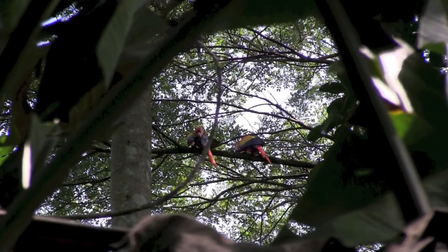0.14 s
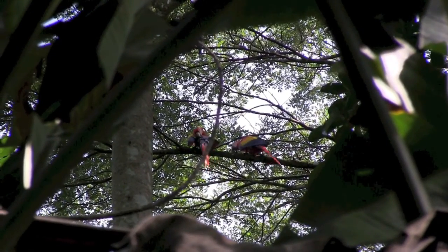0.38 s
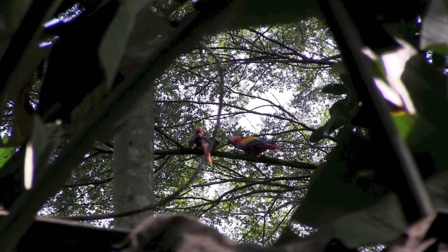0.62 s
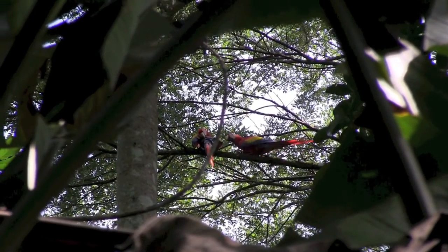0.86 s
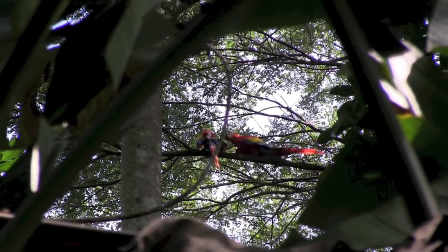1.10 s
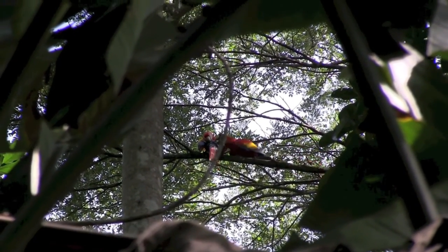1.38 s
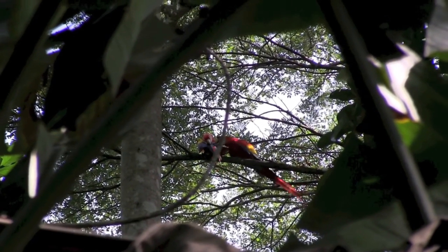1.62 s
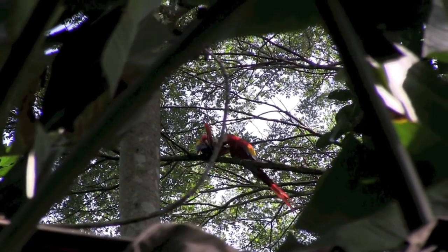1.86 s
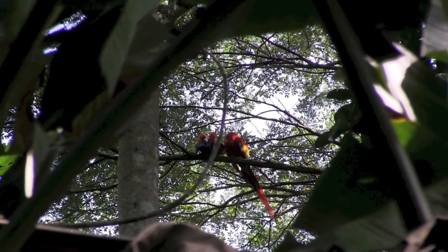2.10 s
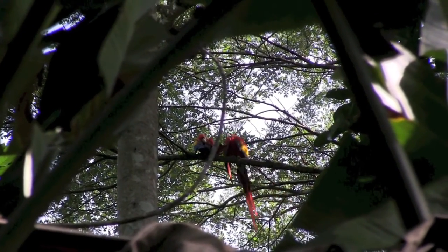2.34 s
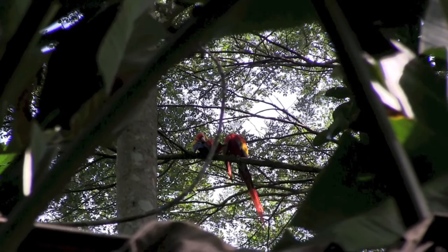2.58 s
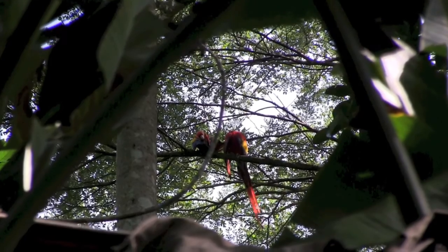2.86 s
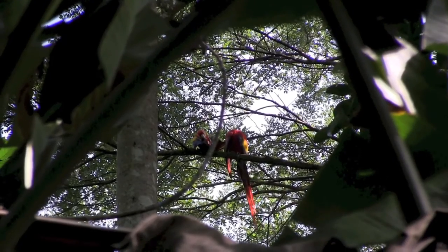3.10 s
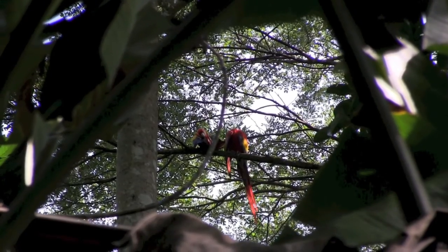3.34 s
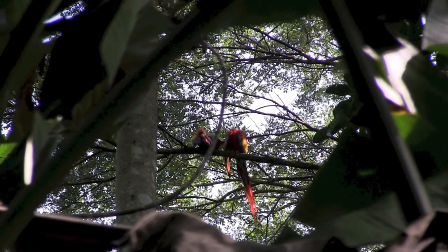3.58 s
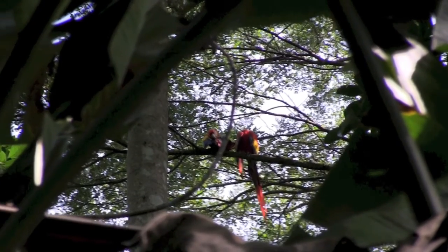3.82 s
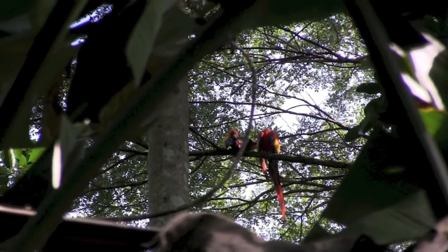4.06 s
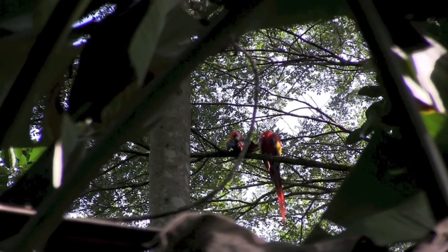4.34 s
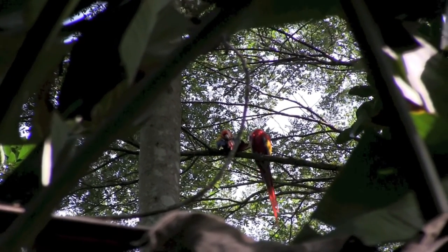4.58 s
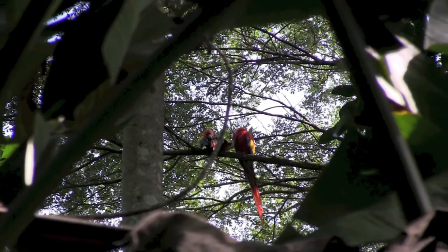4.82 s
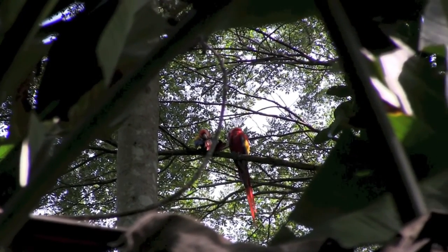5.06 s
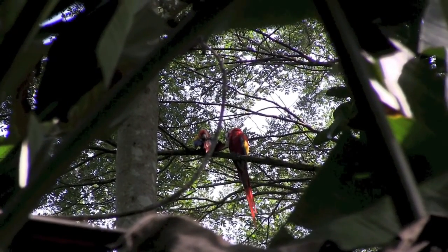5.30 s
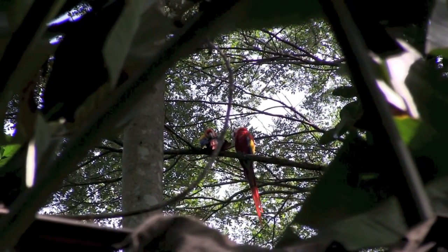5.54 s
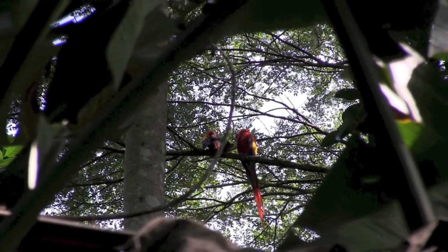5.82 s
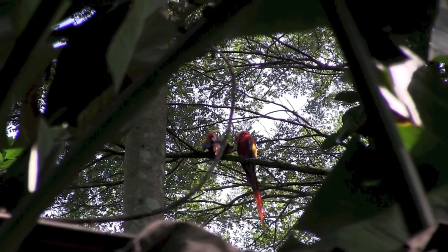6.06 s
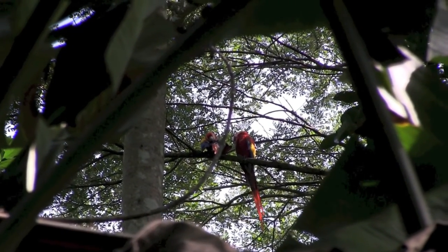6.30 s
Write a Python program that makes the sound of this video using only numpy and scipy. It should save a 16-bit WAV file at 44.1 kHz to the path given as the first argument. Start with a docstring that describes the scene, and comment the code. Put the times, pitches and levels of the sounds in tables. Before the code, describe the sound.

Piercing insect chorus throughout, with one brief hoarse parrot squawk over a soft dove hoot, followed by soft wing rustles, dull knocks and distant bird twitter.

```python
"""A cicada chorus drones near 8 kHz through a tropical forest: noise shaped by the tymbal spectrum.
A second insect buzzes in long bouts as pulses ring a resonance; a cricket chirps about once a second.
A dove hoots as a gliding sine; a large parrot squawks once as pulses and breath ring its throat.
A small bird twitters far off and leaves rustle, all in bands of noise; knocks and twig ticks ring damped modes.
Forest air hisses below as coloured noise, with a low wavering hum and a thin high insect band."""
import sys
import numpy as np
from scipy import signal
from scipy.fft import rfft, irfft
from scipy.io import wavfile

SR = 44100
rng = np.random.default_rng(int(sys.argv[2]) if len(sys.argv) > 2 else 0)


def voltage_ratio(level):
    """Linear amplitude factor for a level in decibels (scalar or array-like)."""
    return 10 ** (np.asarray(level, float) / 20)


def dump_mix(stems):
    """Bounce the given channels to the path in sys.argv[1] as a 16-bit WAV at rate SR."""
    frames = np.atleast_2d(stems).T  # one column per channel
    limited = np.clip(frames, -1, 1)  # hard clip at full scale
    pcm = np.round(limited * 32767).astype(np.int16)
    wavfile.write(sys.argv[1], SR, pcm)


N = 283122
T = np.arange(N) / SR   # s
HZ = np.maximum(np.arange(N // 2 + 1) * SR / N, 1)
# The tables of the point sources give levels before the 2 dB that scene() adds to them all.

# level of the cicada chorus: start_s, level_db
CHORUS_LEVEL = [(0, -23), (1, -24), (1.5, -24), (2.5, -23), (3.5, -24), (4.5, -24), (5.5, -23.5),
                (6.42, -23.5)]
# relative spectrum of the tymbals: frequency_hz, density_db (per Hz)
TYMBAL_SPECTRUM = [(3710, -50.5), (6300, -33.5), (6860, -23), (7510, -4), (7900, 1.5), (8170, 6),
                   (8500, -4.5), (8720, -13.5), (8940, -25.5), (9700, -39.5), (12600, -24.5), (21300, -120)]
# throbs that stand out of the chorus, each at a singer's own rate, one of them slow near 11 Hz: # throbs_per_s,
# depth (0-1), gain_db (before the throb)
STANDOUT_THROBS = [(52.9, 0.15, -8), (64.5, 0.74, -14), (69.8, 0.96, -12.5), (31.8, 0.49, -9),
                   (11.37, 0.14, -8.5)]


def cicadas():
    """Superposition: countless tymbal clicks merge into noise; layers of it throb at singers' own rates, one
    slowly near 11 Hz."""
    clicks = rng.standard_normal((2, N)) * voltage_ratio(0.42 * drift(41))
    for per_s, depth, gain_db in STANDOUT_THROBS:
        phase = 2 * np.pi * np.cumsum(per_s * (1 + 0.00953 * drift(1.65))) / SR
        throb = (1 + np.clip(depth, 0, 1) * np.sin(phase)) ** 2
        clicks += voltage_ratio(gain_db) * rng.standard_normal((2, N)) * throb
    return voltage_ratio(in_time(CHORUS_LEVEL)[0]) * spread(clicks, TYMBAL_SPECTRUM)


BUZZ_PER_S, BUZZ_HZ, BUZZ_WIDTH_HZ = 180, 6540, 420   # width of each of two stages
BOUT_EDGE_S = 0.11
# bouts of the buzzing insect: start_s, fade_start_s, level_db
BUZZ_BOUTS = [(-.5, 1.82, -53.5), (2.93, 4.82, -52.5), (5.53, 7, -53.5)]


def buzzing_insect():
    """Forced resonance: regular wing strokes ring a narrow band, blurred by distance."""
    cycles = np.cumsum(BUZZ_PER_S * (1 + 0.0044 * drift(1.8))) / SR
    strokes = np.diff(np.floor(cycles), prepend=0) * (1 + .3 * rng.standard_normal(N))
    strokes = strokes + .055 * rng.standard_normal(N)
    ring = resonance(resonance(strokes, BUZZ_HZ, BUZZ_WIDTH_HZ), BUZZ_HZ, BUZZ_WIDTH_HZ)
    envelope = 0
    for start, end, db in BUZZ_BOUTS:
        bout = ramp(start, start + BOUT_EDGE_S) - ramp(end, end + BOUT_EDGE_S)
        envelope = envelope + voltage_ratio(db) * bout
    return envelope * rms_one(ring)


CHIRP_HZ, CHIRP_S, CHIRP_RISE = 6040, 0.29, 0.24   # rise as a share of the length
# chirps of the cricket: start_s, level_db
CRICKET_CHIRPS = [(.5, -57), (1.33, -52.5), (2.34, -52.5), (3.47, -52.5), (4.45, -52), (5.33, -53),
                  (6.22, -52.5)]


def cricket():
    """Modulation: each chirp is a tone wavering in level and pitch, inside a wider rasp."""
    phase = 2 * np.pi * np.cumsum(CHIRP_HZ + 25 * drift(25.0)) / SR
    tone = voltage_ratio(2.5 * drift(30.0)) * np.sin(phase)
    rasp = rms_one(resonance(resonance(rng.standard_normal(N), CHIRP_HZ, 250), CHIRP_HZ, 250))
    envelope = sum(voltage_ratio(db) * swell(start, CHIRP_S, CHIRP_RISE) for start, db in CRICKET_CHIRPS)
    return envelope * (.8 * tone + .9 * rasp)


HOOT_PEAK_S, HOOT_END_S, HOOT_DB = 0.41, 0.76, -47
HOOT_SWELL_DB_PER_S, HOOT_FADE_DB_PER_S = 24, 38
# pitch of the hoot, which dips, then lifts: start_s, pitch_hz
DOVE_PITCH = [(0, 455), (.09, 433), (.37, 443), (.55, 457), (.75, 455)]


def dove():
    """Near-pure tone: one long hoot, already under way, swells to its peak, then fades."""
    below_peak_db = np.maximum(HOOT_SWELL_DB_PER_S * (HOOT_PEAK_S - T), HOOT_FADE_DB_PER_S * (T - HOOT_PEAK_S))
    hz, = in_time(DOVE_PITCH)
    hoot = whistle(hz, HOOT_DB - below_peak_db, 0.5, 8.0)
    return hoot * (1 - ramp(HOOT_END_S - .06, HOOT_END_S))


BEAK_OPENS_S, BEAK_OPEN_S = 0.46, 0.52
# parrot squawk, lowest throat resonance: start_s, level_db, centre_hz
SQUAWK_COURSE = [(.375, -67, 1000), (.41, -44.5, 1010), (.44, -40.5, 1030), (.52, -41, 870),
                 (.56, -46.5, 920), (.625, -38, 950), (.69, -47, 1000), (.83, -56.5, 1020),
                 (1.05, -65.5, 980)]
# upper throat resonances before the beak gains: centre_hz, width_hz (first of two stages), gain_db
THROAT_RESONANCES = [(1650, 320, -1), (2940, 190, -1), (3446, 180, -4), (4790, 470, -11.5),
                     (6060, 410, -13), (4100, 2700, -9), (10960, 870, -1)]
# beak gain on the first upper resonance: shut_db, open_db
BEAK_SECOND_DB = (-5.5, 1.5)
# beak gain on the other upper resonances: shut_db, open_db
BEAK_BRIGHT_DB = (-11.5, -2)


def parrot():
    """Source and filter: uneven syrinx pulses and breath ring the throat; an opening beak lifts the upper ones."""
    db, low_hz = in_time(SQUAWK_COURSE)
    second_db = np.interp(T, [BEAK_OPENS_S, BEAK_OPEN_S], BEAK_SECOND_DB)
    bright_db = np.interp(T, [BEAK_OPENS_S, BEAK_OPEN_S], BEAK_BRIGHT_DB)
    cycles = np.cumsum(140 * (1 + .2 * drift(30.0))) / SR   # 140 pulses per s, wandering
    pulses = np.diff(np.floor(cycles), prepend=0) * voltage_ratio(1.3 * drift(60.0))
    breath = 0.2 * rng.standard_normal(N) * np.exp(-2.0 * (cycles % 1))   # fades within each cycle
    source = pulses + breath
    rings = []
    for hz, width, gain_db in THROAT_RESONANCES:
        ring = resonance(resonance(source, hz, width), hz, 2.5 * width)
        rings.append(voltage_ratio(gain_db) * rms_one(ring))
    lowest = rms_one(gliding(source, low_hz, 297))
    bright = sum(ring * (-1) ** k for k, ring in enumerate(rings[1:]))   # signs alternate
    voice = lowest - voltage_ratio(second_db) * rings[0] + voltage_ratio(bright_db) * bright
    return voice * voltage_ratio(db) * (T > SQUAWK_COURSE[0][0]) * (T < SQUAWK_COURSE[-1][0])


NOTE_WIDTH_HZ, NOTE_SAG_PER_S = 95, .03   # sag as a share of the pitch
# held notes of the far bird: start_s, length_s, pitch_hz, level_db
BIRD_NOTES = [(1.48, .18, 5250, -64), (1.82, .12, 2280, -61), (2.15, .25, 5100, -66),
              (3.08, .14, 4550, -61), (3.28, .16, 2270, -62), (4.2, .11, 5050, -63),
              (5.14, .18, 4420, -57.5), (5.48, .5, 4880, -57), (5.85, .3, 4740, -64), (5.5, .75, 3900, -62)]
# quick trills of the far bird: start_s, length_s, centre_hz, span_hz, level_db
BIRD_TRILLS = [(1.72, .25, 4400, 300, -61), (5.13, .34, 5200, 800, -56.5), (5.27, .36, 4700, 900, -54.5),
               (5.28, .4, 3930, 220, -56.5)]


def far_bird():
    """Multipath smearing: the forest turns notes into broken, narrow noise and trills into wider patches."""
    rows = []
    for start, length, hz, db in BIRD_NOTES:
        rows.append((start, length, hz, hz * (1 - NOTE_SAG_PER_S * length), NOTE_WIDTH_HZ, db))
    for start, length, hz, span, db in BIRD_TRILLS:
        rows.append((start, length, hz, hz, span, db))
    return puffs(rows, grain_db=1.5)


# dull knocks and twig ticks: start_s, level_db, pitch_hz, t60_s
KNOCKS_AND_TICKS = [(2.269, -35, 248, 0.14), (2.562, -37, 282, 0.098), (5.855, -41, 2380, 0.027),
                    (6.16, -41, 2020, 0.026)]


def knocks():
    """Damped modes: a soft click rings one mode and its rough neighbours."""
    out = np.zeros(N)
    for start, db, hz, t60 in KNOCKS_AND_TICKS:
        t = T[:round(t60 * SR)]
        ring = sum(np.sin(2 * np.pi * hz * ratio * t) for ratio in (.85, 1, 1.25)) / 2
        onset = np.minimum(t * hz / 2.1, 1)   # full after 2.1 cycles
        out[round(start * SR):][:len(t)] += voltage_ratio(db - 60 * t / t60) * ring * onset
    return out


RUSTLE_SPAN = 1   # width as a share of the centre
# breaths of wind in the leaves: start_s, length_s, centre_hz, level_db
LEAF_RUSTLES = [(1.34, 0.24, 250, -62.5), (2.197, .3, 2830, -58), (2.5, 0.36, 1380, -57),
                (5.0, 1, 1010, -60), (5.72, 0.62, 1440, -60), (6.2, 0.78, 2220, -56.5)]
# wing shuffles: start_s, length_s, level_db (before the feather gains)
WING_SHUFFLES = [(1.445, 0.15, -54), (1.665, 0.22, -51), (2.22, 0.15, -48.5), (2.512, 0.16, -54),
                 (2.843, 0.11, -58.5), (3.553, 0.33, -67), (4.1, 0.22, -61)]
# bands of the feather swish: centre_hz, width_hz, gain_db
FEATHER_BANDS = [(577, 320, -1.5), (1340, 630, -6)]


def leaves():
    """Granular friction: clumped grains of moving foliage and feathers."""
    rows = []
    for start, length, db in WING_SHUFFLES:
        for hz, width, gain_db in FEATHER_BANDS:
            rows.append((start, length, hz, hz, width, db + gain_db))
    for start, length, hz, db in LEAF_RUSTLES:
        rows.append((start, length, hz, hz, RUSTLE_SPAN * hz, db))
    return puffs(rows, grain_db=3.0)


FOREST_T60_S = 0.51


def forest(x):
    """Multiple scattering off trunks and leaves: an exponentially dying noise tail, other in each ear."""
    t = T[:SR]
    tail = rng.standard_normal((2, SR)) * voltage_ratio(-60 * t / FOREST_T60_S) * (t > .012)
    tail = tail / np.sqrt(np.sum(tail ** 2) / 2)
    return signal.fftconvolve(x[None], tail, axes=1)[:, :N]


AIR_DB = -47
# relative spectrum of the forest air: frequency_hz, density_db (per Hz)
AIR_SPECTRUM = [(15, -48), (25, -10), (64, -6), (119, -6.5), (259, -3), (304, -4.5), (504, -7.5),
                (565, -6.5), (664, -10), (3310, -20), (4450, -17), (5470, -22), (6000, -15.5), (7800, -38),
                (13200, -120)]


def forest_air():
    """Broadband noise: a steady coloured hiss."""
    return voltage_ratio(AIR_DB) * spread(rng.standard_normal((2, N)), AIR_SPECTRUM)


TREBLE_DB = -56.5   # mean level
# relative spectrum of the high insect band and the hiss under it: frequency_hz, density_db (per Hz)
TREBLE_SPECTRUM = [(6000, -30), (9000, -8), (11000, -14), (13000, -14), (14000, -11), (14600, -4),
                   (15100, 0), (15800, 0), (17500, -20)]


def high_insects():
    """Band-shaped noise: a thin high insect band over hiss, its level drifting."""
    return voltage_ratio(TREBLE_DB + 1.2 * drift(20.0)) * spread(rng.standard_normal((2, N)), TREBLE_SPECTRUM)


# low hum before a 0.5 dB cut: start_s, pitch_hz, level_db
HUM_COURSE = [(0, 55.4, -68), (.75, 56.4, -69), (.9, 55.8, -59.5), (3.0, 55.9, -60.5), (3.15, 56.9, -57.5),
              (6.42, 58.5, -56.5)]


def low_hum():
    """Amplitude modulation: a low sine wavers irregularly in level."""
    hz, db = in_time(HUM_COURSE)
    return voltage_ratio(-0.5) * whistle(hz, db, 4.1, 3.7)


def rms_one(x):
    """Normalisation: scale to rms 1."""
    return x / np.sqrt(np.mean(x ** 2) + 1e-20)


def in_time(rows):
    """Linear interpolation: the columns of a curve at every sample."""
    s, *columns = np.transpose(rows)
    return [np.interp(T, s, c) for c in columns]


def over_hz(points):
    """Interpolation in log frequency: a spectrum table at every frequency."""
    hz, values = np.transpose(points)
    return np.interp(np.log(HZ), np.log(hz), values)


def ramp(start, end):
    """Linear envelope: from 0 to 1 between two moments."""
    return np.clip((T - start) / (end - start), 0, 1)


def swell(start, length, rise):
    """Sine envelope: a hump that rises over the given share of its length and trails off."""
    u = np.clip((T - start) / length, 0, 1)
    return np.sin(np.pi / 2 * np.minimum(u / rise, (1 - u) / (1 - rise)))


def drift(rate):
    """Low-passed chance: noise at every 40th sample through a double one-pole at rate (Hz); rms 1."""
    r = np.exp(-80 * np.pi * rate / SR)
    slow = signal.lfilter([1], [1, -2 * r, r * r], rng.standard_normal(N // 40 + 2002))[2000:]
    return np.interp(np.arange(N) / 40, np.arange(len(slow)), rms_one(slow))


def resonance(x, hz, width_hz):
    """Damped oscillator: a two-pole resonance with gain near 1 on top."""
    r = np.exp(-np.pi * width_hz / SR)
    poles = [1, -2 * r * np.cos(2 * np.pi * hz / SR), r * r]
    return signal.lfilter([(1 - r * r) / 2, 0, (r * r - 1) / 2], poles, x + 1e-18)


def gliding(x, hz, width_hz):
    """Heterodyning: shift a moving centre down to zero, smooth, shift back."""
    turn = np.exp(2j * np.pi * np.cumsum(hz) / SR)
    smooth = signal.lfilter(*signal.butter(2, width_hz / 2, fs=SR), x / turn)
    return (smooth * turn).real


def whistle(hz, db, waver_db, rate):
    """Phase integration: a sine follows a pitch curve, its level wavering."""
    return np.sqrt(2) * voltage_ratio(db + waver_db * drift(rate)) * np.sin(2 * np.pi * np.cumsum(hz) / SR)


def puffs(rows, grain_db):
    """Filtered noise: humps of grains, each in a band around a gliding centre."""
    out = 0
    for start, length, from_hz, to_hz, width_hz, db in rows:
        hz = np.interp(T, [start, start + length], [from_hz, to_hz])
        grains = rng.standard_normal(N) * voltage_ratio(grain_db * drift(28.0))
        out = out + voltage_ratio(db) * swell(start, length, 0.33) * rms_one(gliding(grains, hz, width_hz))
    return out


# left-right correlation of the diffuse sounds: frequency_hz, correlation (-1 to 1, held to 0.93 at most)
LEFT_RIGHT_LIKENESS = [(60, 0.53), (130, -0.48), (290, -0.24), (640, -0.012), (1410, 0.28), (3100, 0.5),
                       (6820, 0.68), (15000, 1)]


def spread(pair, spectrum):
    """Diffuse-field correlation: two unrelated streams become a coloured, partly alike left and right; rms 1."""
    mid, side = rfft(pair) * voltage_ratio(over_hz(spectrum))
    alike = np.clip(over_hz(LEFT_RIGHT_LIKENESS), -1, .93)
    sides = np.sqrt(1 + alike) * mid + np.sqrt(1 - alike) * side * [[1], [-1]]
    return rms_one(irfft(sides, N))


def scene():
    """Superposition of all sources: point sources in the middle, scattered by the forest."""
    near = buzzing_insect() + cricket() + dove() + parrot() + far_bird() + knocks() + leaves()
    scattered = voltage_ratio(-7) * forest(near)
    background = forest_air() + high_insects() + low_hum()
    return cicadas() + voltage_ratio(2.0) * near + scattered + background


def low_pass(x):
    """Removes everything above the highest recorded frequency."""
    return signal.sosfilt(signal.butter(12, 15730, fs=SR, output="sos"), x)


# colour of the left port against the right: frequency_hz, left_over_right_db
LEFT_OVER_RIGHT = [(60, 0), (180, 0), (550, 0.5), (1650, -1), (4970, 0.5), (15000, 1)]


def record(dry):
    """Linear filtering: the two ports differ a little in colour, half the difference on each."""
    half_db = over_hz(LEFT_OVER_RIGHT) / 2
    ports = irfft(rfft(dry) * voltage_ratio(half_db * [[1], [-1]]), N)
    return low_pass(ports)


dry = scene()
out = record(dry)
dump_mix(out)
```